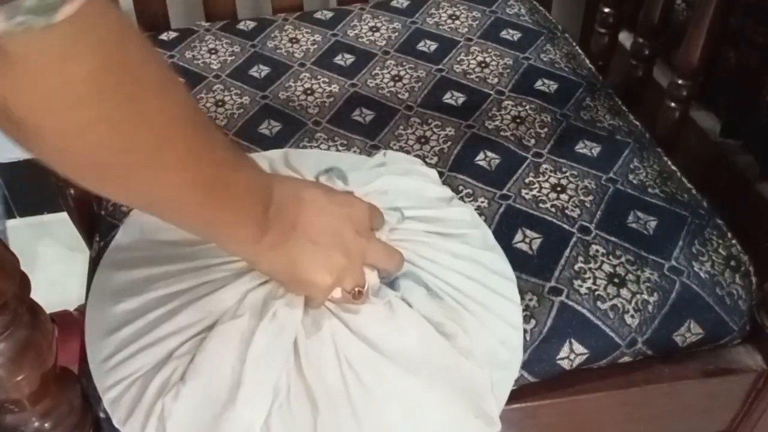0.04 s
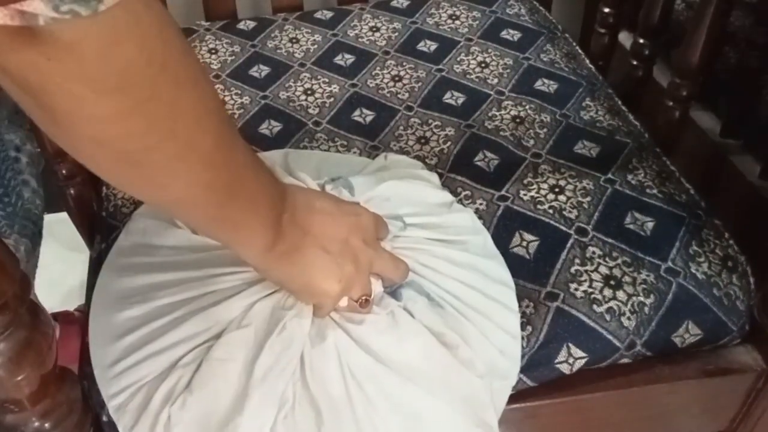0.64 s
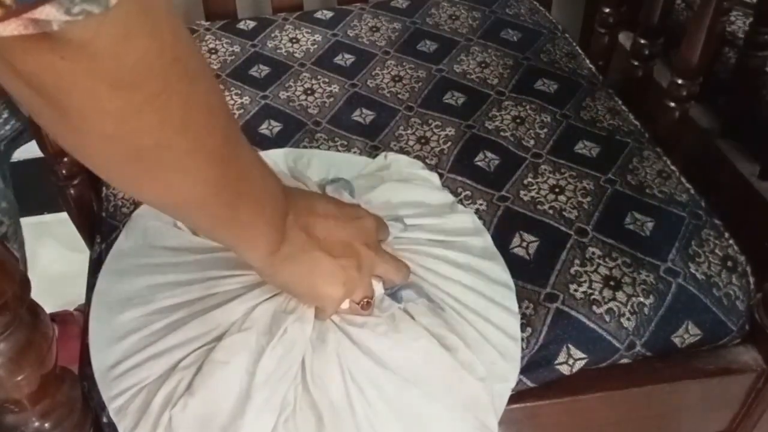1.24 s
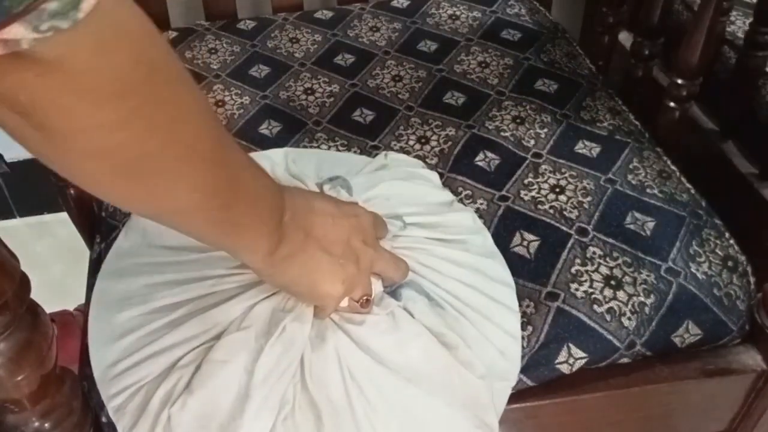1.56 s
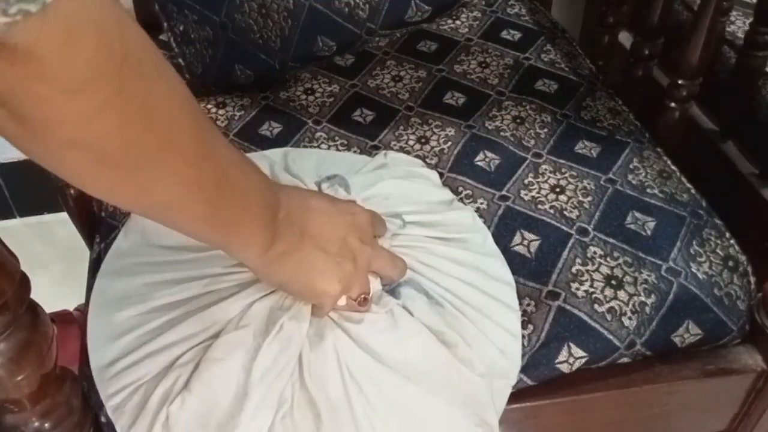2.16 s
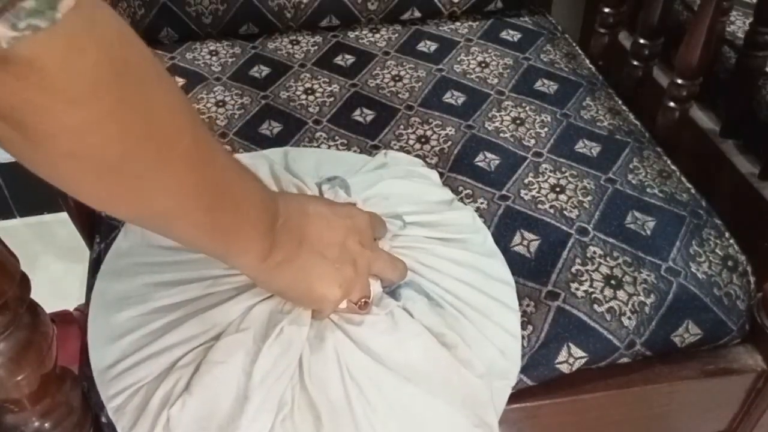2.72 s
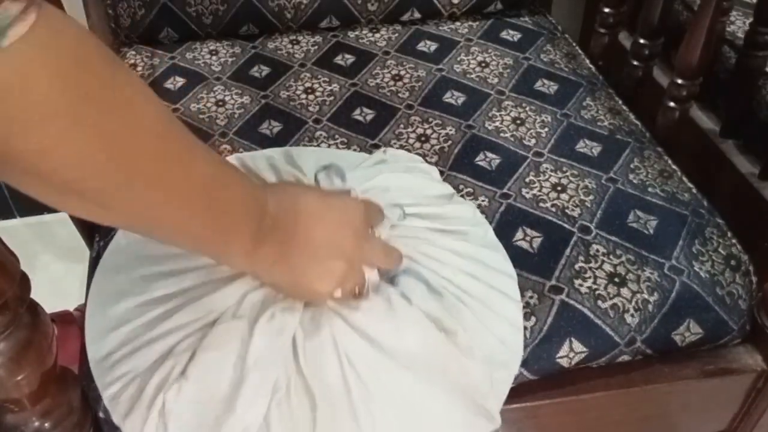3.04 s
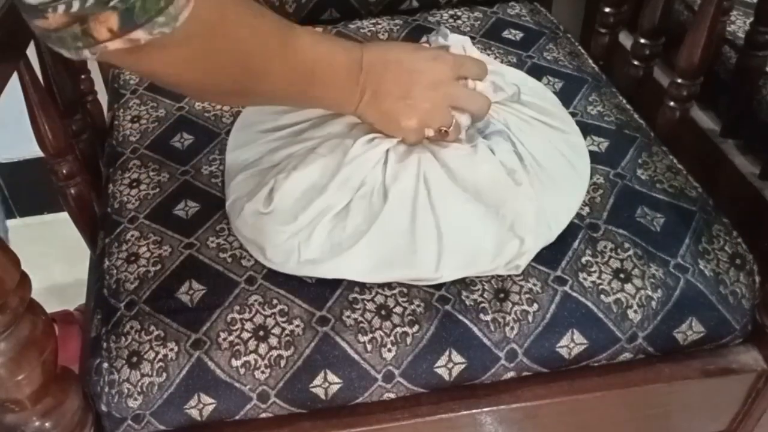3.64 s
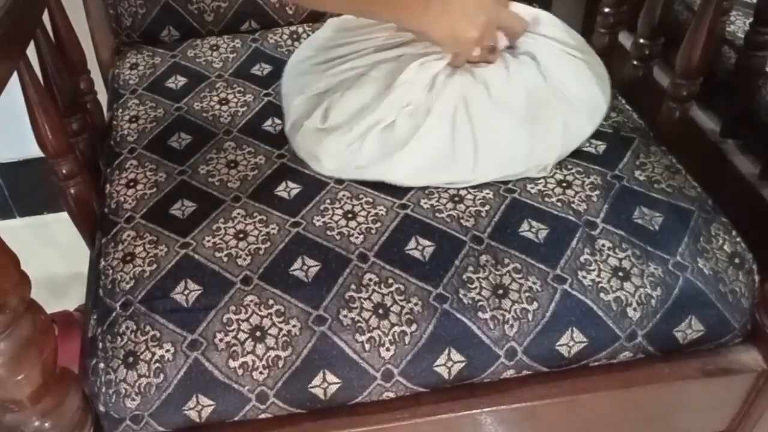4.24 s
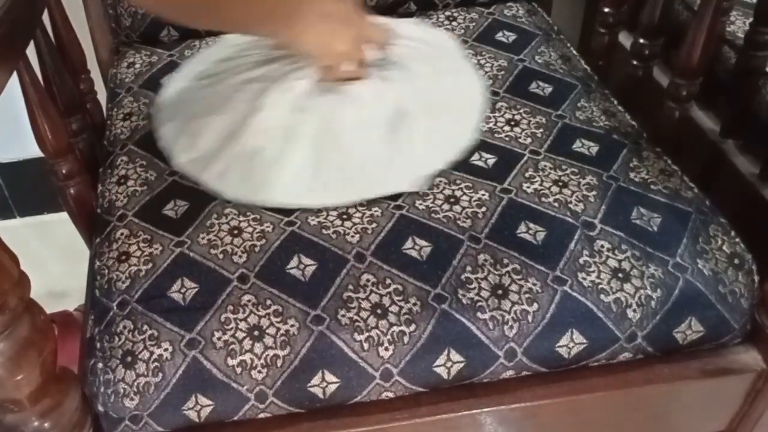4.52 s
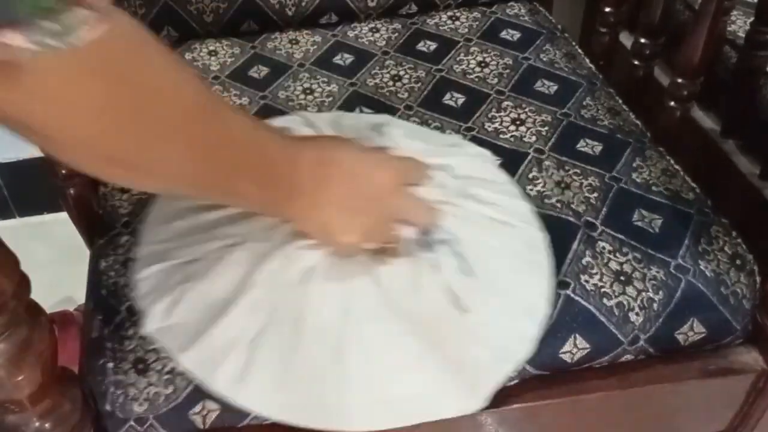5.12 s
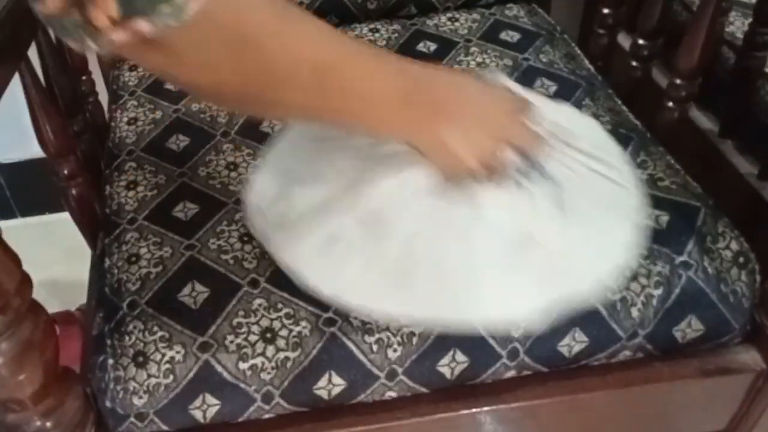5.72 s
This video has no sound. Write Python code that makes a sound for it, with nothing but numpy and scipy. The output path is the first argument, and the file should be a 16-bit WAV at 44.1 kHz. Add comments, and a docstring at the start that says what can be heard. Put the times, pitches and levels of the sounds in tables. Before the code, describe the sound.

Cloth swishes over upholstery in a small room after one sharp knock, with dull thumps, a rap and a brief scrape against wood.

```python
"""Cloth-wrapped lid rubbing a sofa

A metal lid in a damp cloth is gripped, then rubbed to and fro over a sofa cushion in a small room.
First come light rustles, one sharp knock, and a back cushion shifted and dropped into place.
Then the weave hisses with each stroke as its threads catch and let go, and at the turns
the padded lid bumps, raps and scrapes the wooden frame."""
import sys
import numpy as np
from scipy import signal
from scipy.io import wavfile
from scipy.ndimage import uniform_filter1d

SR = 44100
rng = np.random.default_rng(int(sys.argv[2]) if len(sys.argv) > 2 else 0)


def to_wav(s):
    """Save 16-bit WAV."""
    ch = np.atleast_2d(s).T  # columns
    pcm = np.round(np.clip(ch, -1, 1) * 32767)  # PCM
    wavfile.write(sys.argv[1], SR, pcm.astype(np.int16))


N = 254456
TIME = np.arange(N) / SR


def amp(db):
    """Decibels to gain."""
    return 10 ** (np.asarray(db) / 20)


def unit(x):
    """Scales to an rms of one."""
    return x / np.sqrt(np.mean(x ** 2) + 1e-20)


def read(points, hz):
    """Reads a curve on a log-frequency axis."""
    f, value = np.transpose(points)
    return np.interp(np.log(hz + 1), np.log(f + 1), value)


def add(mix, s, sound):
    """Mixes a sound in at s seconds."""
    part = mix[max(round(s * SR), 0):][:len(sound)]
    part += sound[:len(part)]


def lowpass(x, hz):
    """Dulls the top at 12 dB per octave."""
    return signal.lfilter(*signal.butter(2, hz, fs=SR), x)


def colour(x, points, size=4096):
    """Minimum-phase EQ of unit energy, shaped by (freq_hz, level_db) points."""
    log_gain = np.log(amp(np.maximum(read(points, abs(np.fft.fftfreq(size, 1 / SR))), -100)))
    taps = np.fft.ifft(np.exp(np.conj(signal.hilbert(log_gain)))).real[:size // 2]
    return signal.oaconvolve(x, taps / np.linalg.norm(taps))[:len(x)]


def resonate(x, peaks):
    """Passes x through parallel resonances; the result has an rms of one."""
    return unit(sum(amp(db) * signal.lfilter(*signal.iirpeak(hz, hz / width, SR), x)
                    for hz, width, db in peaks))


def ring(modes, t):
    """Dying sines of a struck object, alternating in polarity."""
    return sum(amp(db - 60 * t / t60) * np.sin(2 * np.pi * hz * t) * (-1) ** k
               for k, (hz, db, t60) in enumerate(modes))


def burst(t, t60):
    """A dying cluster of tiny contacts."""
    return rng.standard_normal(len(t)) * amp(-60 * t / t60)


def envelope(start, attack, hold, t60):
    """Rises in a straight line, holds, then dies away; times in seconds."""
    t = TIME - start
    return np.clip(t / attack, 0, 1) * amp(-60 * np.maximum(t - attack - hold, 0) / t60)


def waver(per_s):
    """Smooth random motion of rms one."""
    span = int(SR / per_s)
    return unit(uniform_filter1d(uniform_filter1d(rng.standard_normal(N), span), span))


def slips(per_s, spread_db):
    """Random tiny stick-slip releases of uneven size."""
    sizes = amp(spread_db * np.minimum(rng.exponential(1, N), 4)) * rng.choice([-1, 1], N)
    chance = np.clip(per_s / SR, 1e-3, 1)
    return unit(sizes * (rng.random(N) < chance) / np.sqrt(chance))


def echoes(x, size=32768, spacing=12):
    """The room's diffuse tail: sparse reflections, the treble dying first."""
    # reverb time: freq_hz, t60_s
    decay = [(100, 0.69), (300, 0.55), (1000, 0.54), (4000, 0.55), (9000, 0.34), (15000, 0.23)]
    taps = np.zeros(size)
    at = np.arange(SR // 200, size - spacing, spacing)
    taps[at + rng.integers(0, spacing, len(at))] = rng.choice([-1, 1], len(at))
    hz, t, bands = signal.stft(taps, SR, nperseg=256)
    tail = signal.istft(bands * amp(-60 * t / read(decay, hz)[:, None]), SR)[1]
    return signal.fftconvolve(x, tail / np.linalg.norm(tail))[:N]


def room(x, wet_db):
    """Direct sound with its tail."""
    return x + amp(wet_db) * echoes(x)


def room_tone():
    """A low, restless bed; a faint thin whine comes and goes once."""
    # colour of the bed: freq_hz, level_db
    air_eq = [(25, -51), (45, -1.5), (70, -4), (150, 1.5), (195, -2), (260, -14), (390, -8.5), (700, -16.5),
              (1250, -14.5), (2000, -20.5), (4000, -22), (7200, -29), (9200, -28), (12000, -33),
              (16000, -41)]
    air = amp(-62.5 + 0.57 * waver(per_s=7.3)) * colour(rng.standard_normal(N), air_eq)
    whine_hz, width_hz = 1340, 30
    whine = resonate(rng.standard_normal(N), [(whine_hz, width_hz, 0)])
    return air + amp(-73.5) * envelope(start=2.05, attack=0.15, hold=0.91, t60=0.3) * whine


def snaps():
    """Folds of the gathered cloth snap free in short crisp bursts."""
    # snapping folds: start_s, level_db, t60_s
    folds = [(0.060, -53, 0.018), (0.540, -57.5, 0.11), (2.205, -64, .14)]
    out = np.zeros(N)
    for s, db, t60 in folds:
        add(out, s, amp(db) * burst(TIME[:SR // 2], t60))
    return colour(out, [(500, -20), (1500, -2), (6000, -1), (9500, -7), (15500, -4)])


def dragging():
    """Something heavy drags: coarse slips shake the cushion, finer ones brush the slats."""
    # drags: start_s, attack_s, hold_s, t60_s, judder_db, brush_db
    drags = [(0.0, .005, 0.028, 0.34, -57, -82), (0.42, 0.012, .01, 0.27, -63, -66),
             (0.533, .01, 0.0091, 0.17, -72, -64.5), (0.991, .02, .015, 0.17, -56, -60),
             (1.753, 0.033, .07, .4, -50, -72), (1.885, 0.013, 0.039, 0.43, -48.5, -60.5),
             (2.61, 0.047, 0.018, 0.38, -43, -45), (3.566, 0.031, 0.049, 0.3, -35.5, -40),
             (3.717, 0.04, 0.033, .9, -48, -62), (4.055, .02, 0.12, .4, -49.5, -66),
             (4.839, .05, 0.031, .42, -35.5, -41), (5.195, .025, 0.017, 0.16, -49.5, -52)]
    # the shaken cushion: freq_hz, level_db
    judder_eq = [(30, -20), (60, 3.5), (140, 1), (210, -4), (290, -2), (360, -6.5), (440, -0.5), (560, -19),
                 (720, -20), (1000, -25), (1400, -47), (2500, -42), (5000, -42)]
    # slat resonances: pitch_hz, width_hz, level_db
    slats = [(427, 73, -4), (660, 190, 13), (785, 210, 8), (950, 120, -15)]
    judder = colour(slips(1500, spread_db=2.0), judder_eq)
    brush = resonate(lowpass(slips(4000, spread_db=-1.5), 1100), slats)
    out = sum(envelope(*timing) * (amp(judder_db) * judder + amp(brush_db) * brush)
              for *timing, judder_db, brush_db in drags)
    return room(out, wet_db=-12.5)


def bumps():
    """Padding keeps a blow from the frame's upper modes, a light one misses the lowest; cloth puffs."""
    # padded blows: start_s, level_db, low_cut_hz, high_cut_hz, puff_db (relative to the blow)
    blows = [(0.027, -48, 40, 139, -32), (0.430, -45.5, 330, 400, -17), (0.997, -40.5, 230, 480, -12),
             (1.890, -42, 221, 450, -32), (2.648, -26.5, 141, 260, -25), (2.669, -35.5, 109, 220, -15),
             (3.5635, -12.5, 145, 850, -19.5), (3.612, -29, 90, 221, -9), (3.626, -22.5, 98, 230, -35),
             (3.680, -30, 90, 400, -24), (3.713, -39, 70, 160, -30), (4.239, -51, 98, 296, -6),
             (4.847, -23.5, 90, 560, -24), (4.851, -27, 80, 170, -33), (5.192, -30, 200, 1400, -10.5),
             (5.23, -38.5, 129, 250, -20)]
    # the wooden frame under its cushion: pitch_hz, level_db, t60_s
    frame = [(80.4, -8.5, 0.27), (125, -1.5, 0.089), (160, -3, 0.11), (179, -7, .11), (260, -1.5, 0.1),
             (379, -2, 0.066), (559, 2, 0.023), (662, -3.5, 0.071), (788, 1.5, 0.054), (1193, -6, 0.061),
             (1600, -9, 0.0073)]
    # squeezed cloth: freq_hz, level_db
    puff_eq = [(200, -3.5), (400, 12), (750, -3), (1100, -9), (1700, -1.5), (2300, -9.5), (3200, -11.5),
               (7000, -20.5), (9300, -15.5), (16000, -42)]
    t, out = TIME[:SR // 2], np.zeros(N)
    for s, db, low_cut_hz, high_cut_hz, puff_db in blows:
        padded = lowpass(ring(frame, t), high_cut_hz)
        thud = signal.lfilter(*signal.butter(2, low_cut_hz, "high", fs=SR), padded)
        puff = colour(burst(t, t60=0.23), puff_eq)
        add(out, s, amp(db) * (thud / abs(thud).max() + amp(puff_db) * puff))
    return room(out, wet_db=-9.5)


def strike(blows, modes, crack_eq, crack_t60, ring_db, ring_wet_db, slap_db):
    """Hard contact: each blow cracks; the first rings the object and sends a slap into the room."""
    t = TIME[:SR]
    cracks, tone, slap = np.zeros((3, N))
    for s, db in blows:
        add(cracks, s, amp(db) * burst(t, crack_t60))
    s, db = blows[0]
    ringing = ring(modes, t)
    add(tone, s, amp(db + ring_db) * ringing / abs(ringing).max())
    add(slap, s, amp([db + slap_db]))
    return colour(cracks + echoes(slap), crack_eq) + room(tone, ring_wet_db)


def knock():
    """One sharp knock chatters briefly and leaves a bright ring."""
    # the blow and its chatter: start_s, level_db
    blows = [(1.6743, -22.5), (1.6778, -22.5), (1.6845, -23), (1.6995, -26)]
    # the struck object: pitch_hz, level_db, t60_s
    modes = [(245, -10, 0.17), (454, -7, 0.11), (963, -18, 0.15), (1465, -5, 0.087), (2060, -5.5, 0.11),
             (2226, -4, 0.11), (2718, 1, 0.091), (2810, -1.5, 0.057), (3140, -19, 0.066),
             (3660, -2.5, 0.12), (3710, -2.5, 0.12), (3880, -2, 0.061), (4165, -2, 0.063), (4290, -9, 0.18),
             (4510, -12, 0.18), (5244, -2, 0.16), (5330, -4.5, 0.15), (5360, -4, 0.056), (7060, -3, 0.07),
             (8240, -20, 0.059), (8740, 0.5, 0.05), (9600, -3, 0.046), (11550, -14, .07)]
    # the contact's crack: freq_hz, level_db
    crack_eq = [(50, -22), (110, -5.5), (200, 4.5), (450, -3.5), (650, -2.5), (1000, 2), (1800, -2.5),
                (2300, -2), (4500, 0), (5450, 3), (5850, -10), (8000, -12), (9200, -11), (12200, -15.5),
                (16000, -17)]
    return strike(blows, modes, crack_eq, crack_t60=0.014, ring_db=7.5, ring_wet_db=-5, slap_db=20.5)


def rap():
    """The lid's rim raps the back rail and rebounds."""
    # hit and rebound: start_s, level_db
    blows = [(4.0480, -17), (4.0507, -19.5)]
    # rim and rail ringing together: pitch_hz, level_db, t60_s
    modes = [(424.6, -3, 0.23), (552, -3.5, 0.078), (632, -1, 0.1), (1070, -0.5, 0.065), (1265, 6, 0.027),
             (2020, -1.5, 0.052), (2250, 1.5, 0.022), (2420, -3, 0.11), (2750, -3, 0.072), (2940, -6, .08),
             (4060, -1, 0.029), (4320, -0.5, .04), (5230, -4, 0.028), (6160, -8, 0.034), (7200, -18, .04),
             (10300, -15, 0.023)]
    # the contact's crack: freq_hz, level_db
    crack_eq = [(50, -40), (120, -5), (300, -2), (600, 1), (1250, 1.5), (1750, -10), (2700, -0.5),
                (3300, -8), (4300, -1.5), (6000, -7), (7400, -4.5), (8200, -15), (9500, -10.5),
                (10600, -22), (13000, -22), (16000, -24)]
    return strike(blows, modes, crack_eq, crack_t60=0.011, ring_db=-2, ring_wet_db=-3.5, slap_db=13)


def chatter(start, per_s, release_s):
    """The rim sticks and lets go at a nearly steady rate; each release is a short spray of contacts."""
    cycles = np.cumsum(per_s * (1 + 0.037 * waver(per_s=17))) / SR
    since_release = (cycles - np.interp(start, TIME, cycles)) % 1 / per_s
    return np.exp(-since_release / release_s) * rng.standard_normal(N)


def scraping():
    """The padded rim catches dully on the arm rail, then chatters along it and rasps."""
    # arm rail resonances: pitch_hz, width_hz, level_db
    rail_peaks = [(447, 750, 4.5), (1180, 260, 10.5), (1470, 150, -2), (1920, 220, 3), (2660, 140, 9),
                  (2960, 210, 7), (4030, 590, 5), (4960, 220, -16), (6660, 400, -31), (9000, 840, -37)]
    catch_s, rim_hz, rim_width_hz = 4.847, 4290, 370
    contacts = chatter(catch_s, per_s=89, release_s=0.007)
    rail = resonate(contacts, rail_peaks)
    rasp = amp(-11) * resonate(contacts, [(rim_hz, rim_width_hz, 0)])
    catch = amp(-28) * envelope(catch_s, attack=0.003, hold=0.0022, t60=0.053) * lowpass(rail, 2230)
    slide = amp(-37.5) * envelope(start=4.868, attack=0.014, hold=0.025, t60=0.32) * (rail + rasp)
    return room(lowpass(catch + slide, 9000), wet_db=-5)


def sliding():
    """Gives hiss gain, body gain and arm weight (0 to 1); the gains swell with each move's speed."""
    # the hand grips, the back cushion shifts: peak_s, rise_s, fall_s, hiss_db, body_db
    rustles = [(0.03, 0.14, 0.42, -68, -61.5), (0.43, 0.079, 0.09, -65.5, -68),
               (0.76, 0.45, 0.25, -65.5, -67), (1.01, 0.026, 0.061, -57.5, -59),
               (1.62, .25, 0.13, -76.5, -74), (1.81, 0.13, 0.14, -56.5, -49),
               (2.12, 0.75, 0.32, -70, -69.5), (2.665, 0.12, 0.15, -58, -54),
               (2.9, 0.12, 0.12, -65.5, -61.5)]
    # strokes of the lid over the cushion: peak_s, rise_s, fall_s, hiss_db, body_db
    strokes = [(3.478, 0.42, 0.33, -52.5, -49), (3.89, 0.15, 0.39, -50, -47.5),
               (4.535, 0.24, 0.16, -45.5, -43), (4.862, .19, 0.46, -49.5, -47.5),
               (5.23, 0.12, 0.088, -56.5, -52.5), (5.545, .175, .15, -46, -41.5),
               (5.84, 0.16, .14, -55.5, -52.5)]
    lean = np.interp(TIME, [2.3, 3.3], [0, 1])  # the arm's weight comes onto the lid
    # the cloth creeps under a still hand, and more once the arm leans on it
    hiss_power = amp(-82) ** 2 + (lean * amp(-64.5)) ** 2
    body_power = amp(-71) ** 2 + (lean * amp(-64)) ** 2
    for s, rise, fall, hiss_db, body_db in rustles + strokes:
        speed = np.sin(np.pi / 2 * np.interp(TIME, [s - rise, s, s + fall], [0, 1, 0]))
        hiss_power += (amp(hiss_db) * speed ** 1.5) ** 2
        body_power += (amp(body_db) * speed ** 1.15) ** 2
    return np.sqrt(hiss_power), np.sqrt(body_power), lean


def rubbing():
    """Threads catch and let go, denser and fuller in a firm stroke, which brings out the lid's hollow."""
    # hiss of pressed fibres: freq_hz, level_db
    pressed_eq = [(900, -25), (1500, -5.5), (2000, -9.5), (2700, -16.5), (3300, -14.5), (3900, -8),
                  (5500, -8), (7600, -12), (9200, -7.5), (10200, -13), (11500, -19.5), (15000, -21.5),
                  (16000, -16.5)]
    # higher hiss of barely loaded fibres: freq_hz, level_db
    light_eq = [(900, -30), (1500, -14), (2700, -23), (4000, -5), (5500, -4), (7400, -8), (9300, 0.5),
                (10500, -8), (12000, -10.5), (14500, -13), (16000, -12)]
    # the rub heard through the lid: freq_hz, level_db
    lid_eq = [(35, -60), (60, -17), (115, 2.5), (200, -2), (320, 0), (560, -0.5), (900, -3), (1250, -4),
              (1900, -6.5), (2600, -7.5), (4000, -12), (6000, -27)]
    # the hollow under the lid: pitch_hz, width_hz, level_db
    cavity = [(328, 62, -0.5), (448.3, 20, 4), (1280, 160, -5), (1826, 460, -5), (2580, 40, -13)]
    hiss, body, lean = sliding()
    speed = np.sqrt(hiss / hiss.max())
    creases = amp(1.02 * waver(per_s=22))  # the level flutters as they pass under the rim
    threads = slips(2500 + 14000 * speed, spread_db=1.5)
    pressed = amp(2.5) * lean * colour(threads, pressed_eq)
    light = amp(1) * (1 - lean) * colour(threads, light_eq)
    lid = amp(0.5) * body * colour(slips(1500 + 6000 * speed, spread_db=1.0), lid_eq)
    hollow = amp(-1) * body * speed * resonate(slips(5000, spread_db=0.5), cavity)
    return room(creases * (hiss * (pressed + light) + lid + hollow), wet_db=-14)


def scene():
    """All sources reach one microphone, alike in both channels."""
    hits = knock() + rap()
    mono = hits + rubbing() + snaps() + bumps() + dragging() + scraping() + room_tone()
    return np.array([mono, mono])


def record(dry):
    """The microphone drops the deepest bass; a steep high cut trims the very top."""
    low_cut = signal.butter(3, 58, "high", fs=SR, output="sos")
    high_cut = signal.firwin(511, 15900, window=("kaiser", 9), fs=SR)
    return signal.oaconvolve(signal.sosfilt(low_cut, dry), high_cut[None], "same")


dry = scene()
out = record(dry)
to_wav(out)
```